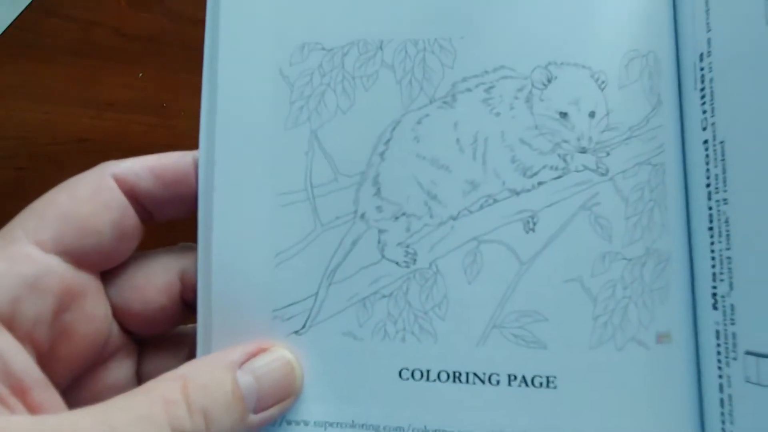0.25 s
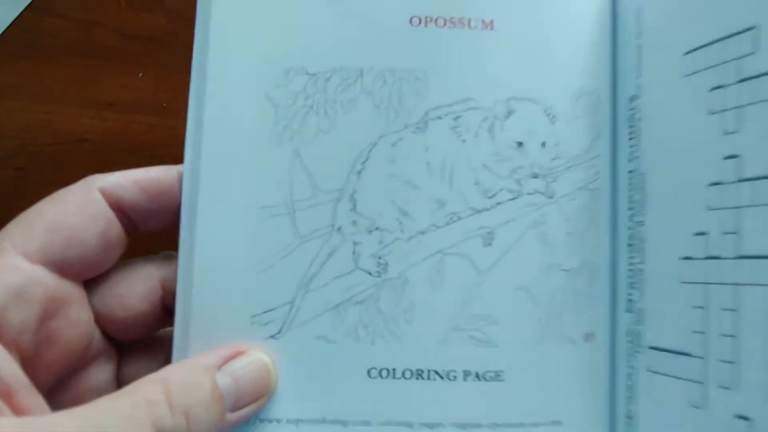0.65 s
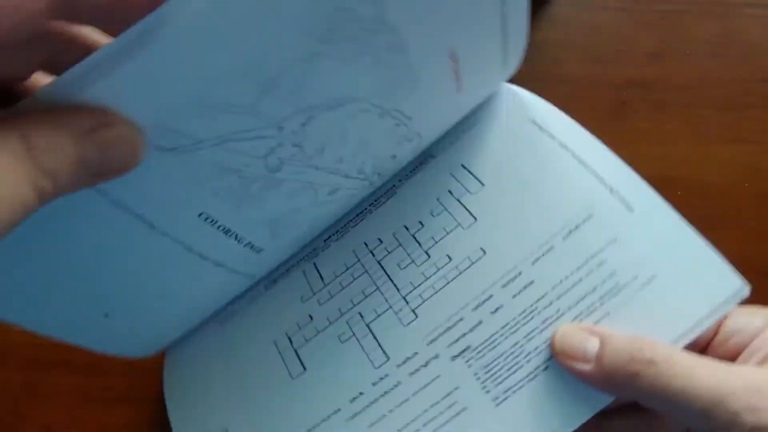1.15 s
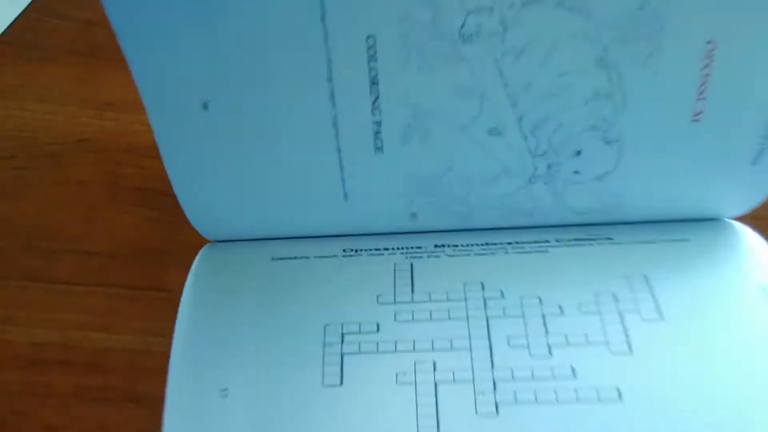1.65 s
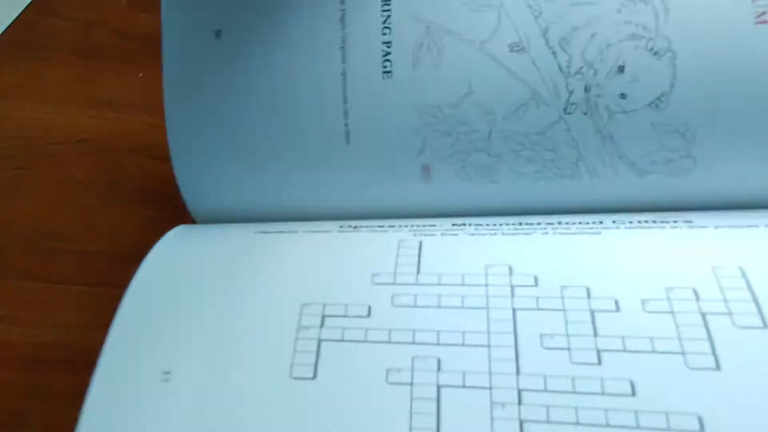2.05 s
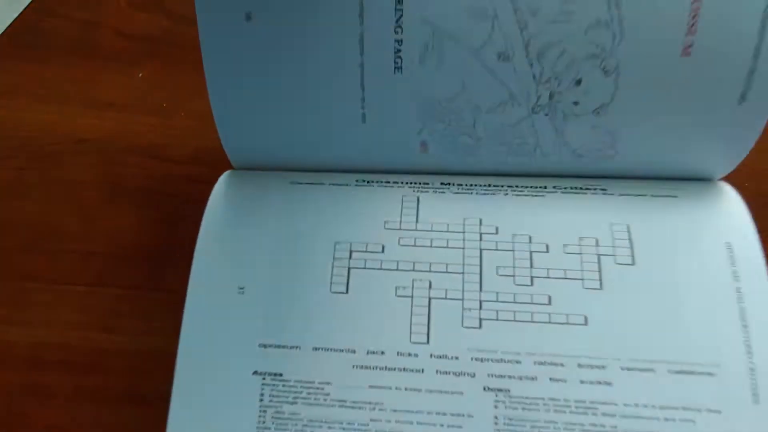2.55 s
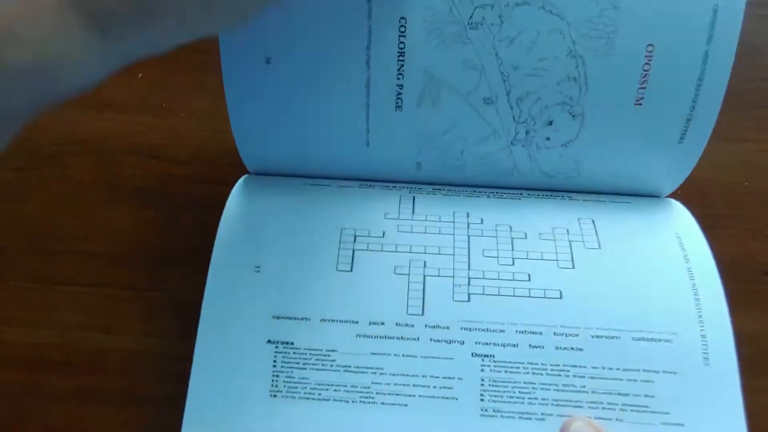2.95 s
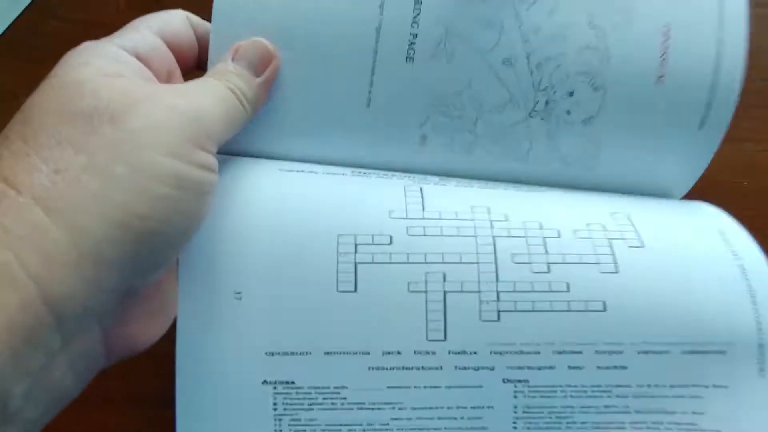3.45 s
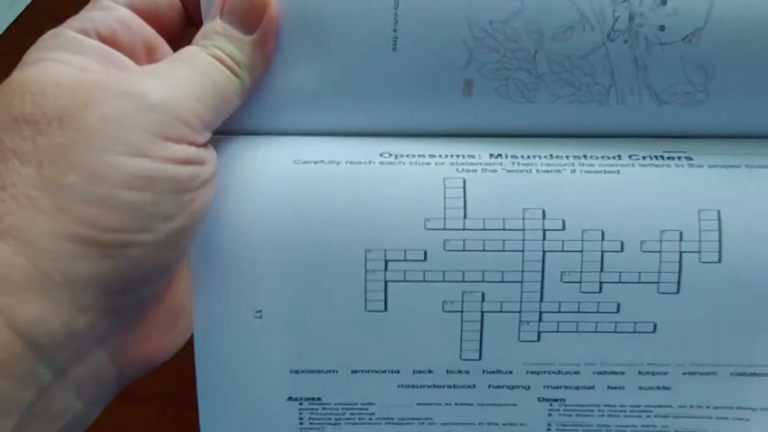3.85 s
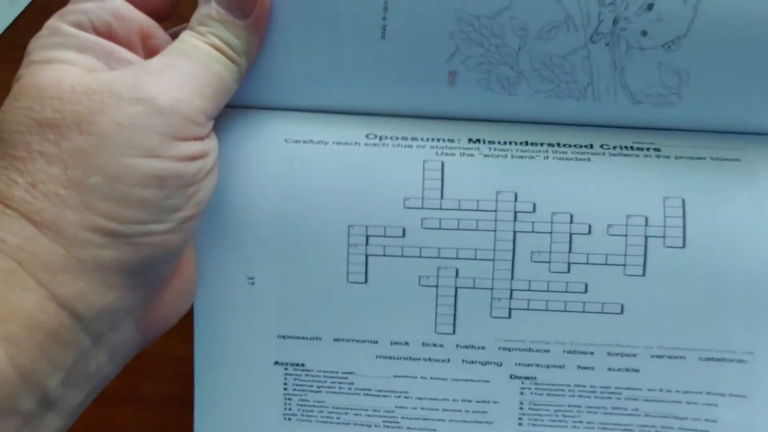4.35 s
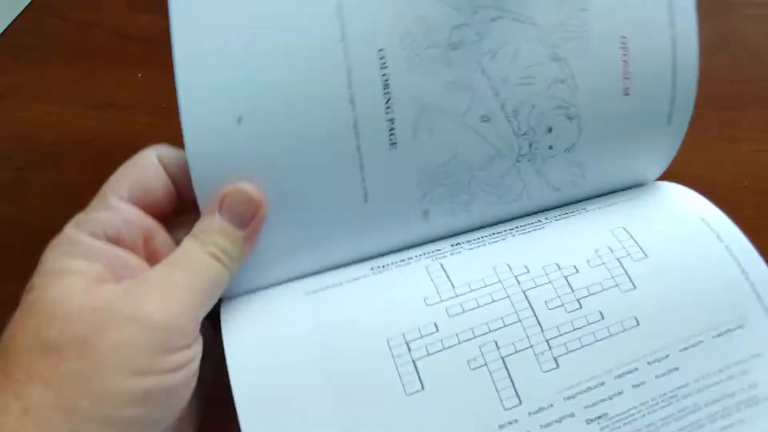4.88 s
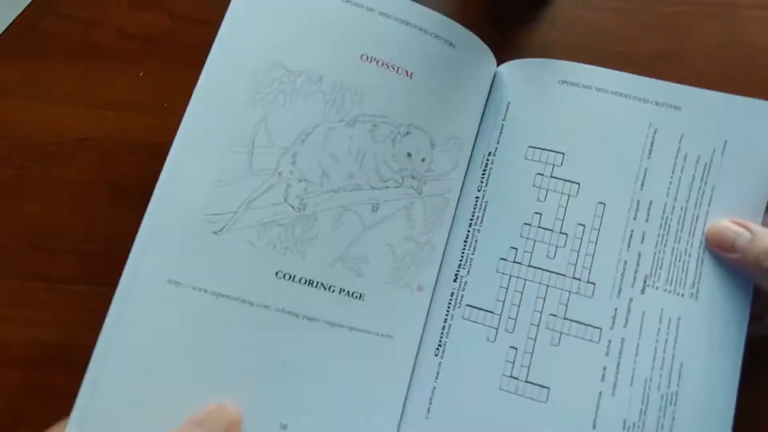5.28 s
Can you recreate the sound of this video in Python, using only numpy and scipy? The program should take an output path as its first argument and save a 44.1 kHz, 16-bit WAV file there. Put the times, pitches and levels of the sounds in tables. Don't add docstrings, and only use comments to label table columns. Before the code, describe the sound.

A low wavering hum and faint hiss underlie close, dry paper sounds in a small room. Fingertips brush the pages of a paperback, sheets buckle hollowly, then only faint scuffs remain. The pages slap flat loudly, scrape in brief separate rustles, go quiet again, and end in the busiest handling, with thuds, crisp ticks and the hardest snap. The microphone is very near.

```python
import sys
import numpy as np
from scipy import signal
from scipy.fft import rfft, irfft, next_fast_len
from scipy.io import wavfile
from scipy.ndimage import uniform_filter1d, minimum_filter1d

SR = 44100
rng = np.random.default_rng(int(sys.argv[2]) if len(sys.argv) > 2 else 0)


def undo_db(level):
    steps = np.asarray(level, float) / 20
    return 10 ** steps


def to_wav(sig):
    pcm = np.clip(np.atleast_2d(sig), -1, 1) * 32767
    pcm = np.round(pcm).astype(np.int16)
    wavfile.write(sys.argv[1], SR, pcm.T)


N = 243431
FRAMES = dict(fs=SR, nperseg=256, noverlap=192)

# (frequency [Hz], likeness [-1 to 1])
PAPER_ALIKE = [(60, 1), (130, 0.97), (290, 0.83), (640, 0.83), (1410, 0.0035), (3100, 0.15), (6820, -0.049),
               (15000, 0.98)]


def evened(x):
    return x / np.sqrt(np.mean(x ** 2) + 1e-20)


def read(points, hz):
    f, value = np.transpose(points)
    return np.interp(np.log(hz + 1), np.log(f + 1), value)


def fine(t, v):
    return np.interp(np.arange(N) / SR, t, v)


def panned(x, lean_db):
    return x * undo_db(np.array([.5 * lean_db, -.5 * lean_db]))


def add(mix, s, sound):
    part = mix[:, round(s * SR):][:, :sound.shape[1]]
    part += sound[:, :part.shape[1]]


def coloured(x, db_of_hz):
    n = x.shape[-1]
    size = next_fast_len(n + 512)
    gain = undo_db(db_of_hz(np.fft.rfftfreq(size, 1 / SR)))
    return irfft(rfft(x, size) * gain, size)[..., :n]


def low_passed(x, hz, order=6):
    return signal.sosfilt(signal.butter(order, hz, fs=SR, output="sos"), x)


def ports(pair, alike):
    n = pair.shape[1]
    same = np.clip(read(alike, np.fft.rfftfreq(n, 1 / SR)), -.99, .99)
    mid, side = rfft(pair) * np.sqrt([1 + same, 1 - same])
    return irfft(np.array([mid + side, mid - side]), n) / 2


def resonate(x, hz, width_hz):
    turn = np.exp(2j * np.pi * np.cumsum(hz * np.ones(x.shape[-1])) / SR)
    r = np.exp(-np.pi * width_hz / SR)
    return 2 * (turn * signal.lfilter([1 - r], [1, -r], x / turn)).real


def resonate_twice(x, hz, width_hz):
    return resonate(resonate(x, hz, width_hz), hz, width_hz)


def patchwork(frames, bins, length, width=1):
    x = uniform_filter1d(rng.standard_normal((frames, bins)), length, 0)
    return evened(uniform_filter1d(x, width, 1)).T


def strokes(t, s, db, rise_ms, hold_ms, fall_ms):
    def column(v):
        return np.maximum(v * np.ones(len(s)), 1)[:, None]

    ms = 1000 * (t - s[:, None])
    before = np.maximum(-ms, 0) / column(rise_ms)
    after = np.maximum(ms - column(hold_ms), 0) / column(fall_ms)
    rounding = 0.056
    under = np.hypot(before + after, rounding) - rounding
    return undo_db(2 * (db[:, None] - 20 * np.minimum(under, 10)))


def bursts(rows, steady_db, rise_ms, fall_ms):
    t = np.arange(0, N / SR, 1 / 1000)
    power = strokes(t, *np.transpose(rows), rise_ms, 0, fall_ms).sum(0)
    return np.sqrt(fine(t, power) + undo_db(2 * steady_db))


def quiet():
    # (frequency [Hz], level [dB per Hz])
    tone_colour = [(12, -46), (20, -19.5), (38, -2), (60, 30), (74, -7), (91, -31.5), (123, -18),
                   (210, -35), (262, -26.5), (422, -43), (574, -35), (1290, -50.5), (6200, -49),
                   (7200, -37), (8300, -46.5), (9200, -52.5), (16000, -59.5)]
    # (frequency [Hz], likeness [-1 to 1])
    tone_alike = [(60, 1), (180, -0.031), (550, 0.32), (1650, -0.44), (4970, -0.83), (15000, 0.64)]
    # (frequency [Hz], left-right [dB])
    tone_lean = [(60, -4.5), (180, -0.5), (550, 7.5), (1650, -0.5), (4970, 3.5), (15000, 4)]
    # (time [s], level [dB])
    jolts = [
        (2.85, -64.5),
        (4.95, -60),
        (5.18, -63),
        (5.36, -68),
    ]

    def tone_db(f):
        balance_db = np.array([[.5], [-.5]]) * read(tone_lean, f)
        return balance_db + read(tone_colour, f) - 40 * (f < 90)

    pair = ports(rng.standard_normal((2, N)), tone_alike)
    tone = undo_db(-72.5) * evened(coloured(pair, tone_db))

    shaken = rng.standard_normal((2, N)) * undo_db([[1.2], [-1.2]])
    drone = resonate_twice(pair, hz=55.0, width_hz=25.0)
    drone = drone + 0.64 * resonate_twice(shaken, hz=74.0, width_hz=27.0)
    drone = drone / np.sqrt(uniform_filter1d(drone.mean(0) ** 2, 6000) + 1e-9)
    sway = evened(resonate_twice(shaken[0, ::-1], hz=32.0, width_hz=20.0))
    drone = drone + undo_db(-4.5) * sway * np.array([[1], [.3]])

    throb_db = 4.0 * np.cos(2 * np.pi * 5.25 * (np.arange(N) / SR - 0.13))
    wander = evened(uniform_filter1d(uniform_filter1d(rng.standard_normal(N), 3000), 3000))
    drone_gain = bursts(jolts, -76 + 5 * wander + throb_db, rise_ms=130, fall_ms=330)
    return tone + drone_gain * drone * undo_db([[.3], [-.3]])


def handling():
    # (time [s], level [dB], rise [ms], hold [ms], fall [ms])
    glides = [(.762, -61, 22, 27, 70), (0.907, -46.5, 27, 92, 52), (1.041, -43, 32, 32, 37),
              (1.115, -27.5, 7.1, 9.3, 70), (1.715, -54, 47, 37, 100), (1.836, -46, 68, 18, 40),
              (1.952, -74.5, 60, 170, 110), (2.228, -61, 26, 3.5, 51), (2.328, -58.5, 21, 3.3, 83),
              (2.46, -58, 43, 3, 120), (2.881, -51, 56, 22, 60), (2.946, -34, 62, 2.5, 37),
              (3.156, -52, 58, 3.2, 30), (3.2, -54.5, 18, 2.1, 50), (3.66, -55, 44, 42, 49),
              (4.149, -53.5, 10, 2.1, 50), (4.322, -58.5, 14, 2.87, 64), (4.596, -50.5, 13, 77, 73),
              (4.778, -44, 110, 7.9, 78), (4.87, -42.5, 65, 180, 60), (5.095, -35.5, 37, 7.5, 120),
              (5.302, -31.5, 140, 2.7, 81), (5.4, -36.5, 110, 76, 38)]
    # (time [s], level [dB], rise [ms], hold [ms], fall [ms])
    rubs = [(1.14, -45, 30, 146, 51), (1.285, -51.5, 63, 44, 15), (1.42, -57.5, 29, 2.4, 62),
            (1.565, -58.5, 110, 3.7, 51), (2.782, -44, 3.4, 24, 22), (2.809, -37.5, 4.6, 4.3, 130),
            (2.943, -35.5, 89, 4, 32), (3.02, -58, 18, 5.3, 50), (3.303, -44, 30, 3.2, 63),
            (3.389, -41.5, 30, 21, 54), (3.472, -26, 41, 12.7, 64), (3.528, -38, 63, 63, 53),
            (3.78, -62, 56, 32, 21), (3.879, -52.5, 13, 31, 65), (3.95, -37.5, 57, 36, 34),
            (4.496, -64, 30, 2.2, 42), (4.719, -33.5, 71, 3.9, 35), (4.97, -46.5, 46, 27, 40),
            (5.033, -28, 25, 120, 140), (5.2, -52.5, 120, 60, 64), (5.352, -32, 77, 14, 490)]
    # (time [s], rumble [dB], rise [ms], fall [ms], pocket resonance [Hz])
    page_bends = [(.78, -65.5, 25, 89, 620), (4.32, -63.5, 15, 38, 1050), (4.495, -64.5, 20, 37, 1100),
                  (.9, -68.5, 97, 350, 784), (1.131, -37.5, 2.2, 100, 879), (1.173, -45, 62, 88, 1006),
                  (1.241, -43, 66, 14, 1115), (1.29, -58, 46, 58, 1041), (1.715, -67.5, 51, 350, 718),
                  (1.85, -90, 56, 150, 599), (2.492, -66.5, 120, 170, 661), (2.79, -33, 3.7, 36, 810),
                  (2.807, -21.5, 4, 50, 782), (2.945, -42.5, 100, 41, 752), (3.153, -48, 58, 117, 633),
                  (3.293, -50.5, 64, 93, 796), (3.388, -41, 16, 90, 1078), (3.476, -39, 82, 180, 887),
                  (3.68, -51.5, 170, 88, 604), (3.975, -43.5, 120, 36, 880), (4.705, -43.5, 62, 51, 942),
                  (4.927, -46, 100, 400, 801), (5.112, -36.5, 190, 37, 861), (5.158, -27.5, 65, 30, 857),
                  (5.25, -29, 170, 45, 876), (5.35, -27, 42, 99, 960), (5.48, -43, 180, 140, 943)]
    # (time [s], rumble [dB], pocket resonance [Hz])
    twitches = [(0.83, -71, 650), (1.429, -64.5, 862), (1.559, -72, 1029), (2.097, -67.5, 645),
                (2.226, -83, 507), (2.329, -61.5, 625.5), (3.8, -53, 650), (3.04, -69.5, 718),
                (4.145, -65, 792), (4.323, -70, 905), (4.5, -63, 766)]
    t = np.arange(0, N / SR, 1 / 1000)
    glide = strokes(t, *np.transpose(glides)).sum(0)
    rub = strokes(t, *np.transpose(rubs)).sum(0)
    hiss = glide + rub

    twitch_rise_ms, twitch_fall_ms = 8.4, 17
    rows = page_bends + [(s, db, twitch_rise_ms, twitch_fall_ms, hz) for s, db, hz in twitches]
    s, db, rise_ms, fall_ms, hz = np.transpose(rows)
    bends = strokes(t, s, db, rise_ms, 0, fall_ms)
    rumble = bends.sum(0)
    pocket_hz = hz @ bends / rumble

    middle = glide * undo_db(2 * -18) + rub * undo_db(2 * -4.5) + rumble * undo_db(2 * -7)
    middle_db = np.minimum(10 * np.log10(middle / hiss), 13)
    return t, 10 * np.log10(hiss), middle_db, 10 * np.log10(rumble), pocket_hz


def grit(grain_ms, grain_db, clump_ms, clump_db):
    grains, clumps = rng.standard_normal((2, N))
    stutter_db = grain_db * evened(uniform_filter1d(grains, round(grain_ms * SR / 1000)))
    stutter_db = stutter_db + clump_db * evened(uniform_filter1d(clumps, round(clump_ms * SR / 1000)))
    return ports(rng.standard_normal((2, N)) * evened(undo_db(stutter_db)), PAPER_ALIKE)


def lined(x, line_db):
    z = signal.stft(x, SR, nperseg=1024, noverlap=768)[2]
    lines = patchwork(z.shape[2], z.shape[1], length=24)
    y = signal.istft(z * undo_db(line_db * lines), SR, nperseg=1024, noverlap=768)[1][:, :N]
    return evened(y) * np.sqrt(np.mean(x ** 2))


def slide():
    # (frequency [Hz], level [dB per Hz])
    hiss_colour = [(710, -26), (1200, -16), (1560, -10.5), (2270, -10), (2920, -10.5), (4450, -10),
                   (4910, -6), (5470, -8), (5780, -5.5), (7200, 1.5), (8050, 4.5), (11300, -28),
                   (12200, -44), (14700, -56.5), (16000, -76.5)]
    # (time [s], left-right [dB])
    hands = [
        (.72, -16),
        (1.9, 4),
        (1.96, -12.5),
        (2.64, -4.5),
        (3.35, -9),
        (3.8, -13.5),
        (5.02, -10),
        (5.52, -9),
    ]
    # (time [s], peak [dB], left-right [dB], length [ms])
    scuffs = [(1.782, -49, 17, 6.4), (1.919, -63.5, -7, 10.3), (2.096, -76, -15, 4.1),
              (2.221, -58, -8, 4.6), (2.324, -69, -27, 2.8), (2.915, -37.5, -15, 1), (3.303, -55, -24, 6),
              (3.388, -33, 0, 4), (3.878, -58, 5, 3.9), (4.3151, -60.5, -17, 6.1), (4.396, -53, -3.5, 1.1),
              (4.491, -63.5, -21, 0.92), (4.589, -54, -18.5, 1.3), (4.715, -32.5, 1.5, 7.3),
              (5.019, -35.5, 39, 0.79), (5.1549, -11.5, 8, 1.16)]
    friction = grit(grain_ms=1.0, grain_db=1.0, clump_ms=32.0, clump_db=1.0)
    hz, t, z = signal.stft(friction, **FRAMES)
    patches = patchwork(len(t), len(hz), length=24, width=4)
    streaks = patchwork(len(t), len(hz), length=45)
    times, hiss_db, middle_db = handling()[:3]
    middle_db = np.interp(t, times, middle_db) + 10.5
    reach = np.clip(np.log(6500 / (hz + 1)) / np.log(1.9), 0, 1)[:, None]
    colour_db = read(hiss_colour, hz)[:, None] + reach * middle_db
    z = z * undo_db(colour_db + 1.6 * patches + 2.2 * streaks)
    hiss = signal.istft(z, **FRAMES)[1][:, :N]

    treble = hz > 4500
    treble_share = np.mean(abs(z[:, treble]) ** 2) / np.mean(abs(z) ** 2) * np.mean(treble)
    hiss = hiss / np.sqrt(treble_share * np.mean(hiss ** 2))
    hiss = lined(hiss, line_db=4.5)

    hand_s, hand_lean_db = np.transpose(hands)
    strength = undo_db(fine(times, hiss_db)) * panned(0.85, fine(hand_s, hand_lean_db) + 11.1)
    for s, db, lean_db, ms in scuffs:
        u = np.arange(3000) / SR / (max(ms, 1) / 1000)
        jump = undo_db(db - 2.5) * (u * np.exp(1 - u))[None]
        add(strength, s - .001, panned(jump, np.array([lean_db])))
    return hiss * strength


def fizz():
    # (time [s], level [dB])
    flicks = [
        (2.95, -79.5),
        (5.285, -68.5),
        (5.34, -56),
        (5.43, -55),
        (5.5, -66),
    ]
    hz, t, z = signal.stft(rng.standard_normal((2, N)), **FRAMES)
    streaks = patchwork(len(t), len(hz), length=30, width=3)
    z = z * undo_db(5.0 * streaks) * ((hz > 12000) & (hz < 15800))[:, None]
    top = evened(signal.istft(z, **FRAMES)[1][:, :N])
    haze_db = -76 + 0.33 * fine(*handling()[:2])
    return top * bursts(flicks, haze_db, rise_ms=50, fall_ms=23)


def bend():
    # (factor on the resonance, width [Hz], level [dB])
    pocket_modes = [(.72, 107, 0.5), (1.0, 134, -3), (1.2, 120., -2), (1.55, 205, -8.5),
                    (2.15, 230., -11.5)]
    t, _, _, level_db, pocket_hz = handling()
    level_db, pocket_hz = fine(t, level_db), fine(t, pocket_hz)
    creak = grit(grain_ms=3.1, grain_db=1.5, clump_ms=25.0, clump_db=3.5)

    pocket = np.zeros((2, N))
    for k, (factor, width_hz, db) in enumerate(pocket_modes):
        pocket += (-1) ** k * undo_db(db) * resonate(creak, factor * pocket_hz, width_hz)
    pocket = evened(signal.lfilter(*signal.butter(2, [300, 2400], "band", fs=SR), pocket))

    flap_db = -2 - 23.5 * np.log2(np.maximum(pocket_hz / 650.0, 1))
    flap = evened(resonate(resonate(creak[:, ::-1], 230.0, 280.0), 260.0, 240.0))
    return undo_db(level_db) * (pocket + undo_db(flap_db) * flap)


def rings():
    # (time [s], peak [dB], pitch [Hz], width [Hz],
    # length [ms])
    flexes = [(.811, -51.5, 5280, 1100, 19), (1.124, -35, 206, 101, 24), (1.141, -40, 830, 118, 13),
              (1.153, -33, 925, 121, 14), (1.161, -28.5, 930, 60.6, 20), (1.176, -33.5, 1455, 200, 43),
              (1.21, -32.5, 1460, 306, 47), (1.212, -34.5, 1996, 158.5, 59), (1.212, -36, 887, 101, 53),
              (1.238, -30.5, 970, 148, 8.6), (1.25, -44, 836, 79.3, 17), (1.28, -49, 1006, 120, 69),
              (2.776, -34, 4780, 913, 99), (2.806, -14, 2100, 1200, 2.5), (2.81, -29.5, 2190, 1220, 67),
              (2.845, -28.5, 286, 151, 15.4), (3.46, -31, 2190, 201.7, 66), (3.46, -31.5, 3860, 297, 45),
              (3.575, -40, 257, 100, 64), (3.465, -29, 5880, 400, 62), (3.785, -51.5, 1900, 300, 48),
              (3.93, -44, 1760, 400, 92), (3.95, -46, 616, 199.7, 88), (4.7, -34, 2097, 401, 16),
              (5.044, -28, 2140, 398, 15), (5.042, -23, 4930, 800, 140), (5.072, -23.5, 2310, 402, 43),
              (1.115, -34, 5500, 1210, 87), (4.925, -51.5, 1060, 298, 53), (5.118, -28, 1000, 302, 47),
              (5.21, -25.5, 2230, 610, 72), (5.346, -11.5, 897, 151, 13), (5.35, -28, 2440, 304, 43),
              (5.385, -34.5, 280, 99, 54), (5.385, -34, 8050, 500, 140), (5.16, -34.5, 256, 149, 30),
              (5.468, -31.5, 870, 250, 6.2), (5.477, -28, 875, 300, 4.3),
              (1.41, -66.5, 1160, 149, 100), (1.535, -63.5, 1084, 119, 64), (1.69, -69, 416, 79.5, 52),
               (1.93, -66.5, 195, 40, 190), (2.21, -59.5, 514, 101, 48), (2.46, -59.5, 1650, 120, 25),
               (3.005, -61.5, 111.7, 40, 54), (3.29, -47, 2070, 300, 11), (3.378, -36, 1130, 200, 22),
               (3.385, -38, 2270, 200, 40), (4.135, -60, 320, 100.4, 57), (4.31, -59.5, 600, 150, 40),
               (4.485, -65, 603, 151, 53), (4.712, -27.5, 5440, 500, 17), (5.125, -31, 1670, 500, 50),
               (5.22, -42, 1460, 400, 47), (2.812, -24.5, 4300, 1500, 58), (1.29, -51.5, 2500, 1480, 61),
               (5.16, -32.5, 1570, 494, 100), (5.342, -22.5, 1450, 400, 33)]
    # (time [s], peak [dB], pitch [Hz])
    ticks = [(1.783, -59, 7500), (2.9152, -31, 8200), (4.6846, -24, 7940), (5.09, -16, 6800),
             (5.1051, -13, 7550), (5.109, -14, 7700), (5.1522, -14, 7800), (5.453, -27, 8100),
             (5.459, -24, 7700), (2.806, -18.5, 8000), (5.0185, -24, 5900), (3.474, -25, 7760),
             (3.485, -21, 7400), (3.521, -27.5, 7700), (5.276, -20.5, 8000), (2.944, -26, 8300)]
    tick_width_hz, tick_ms = 2600, 1.7
    rows = flexes + [(s, db, hz, tick_width_hz, tick_ms) for s, db, hz in ticks]
    out, t = np.zeros((2, N)), np.arange(8192) / SR
    peak_at = 0.23
    for s, db, hz, width_hz, ms in rows:
        u = np.clip(t / (max(ms, 2) / 1000), 0, 1)
        swell = np.sin(np.pi * u ** (np.log(.5) / np.log(peak_at)))
        scrape = ports(rng.standard_normal((2, len(t))), PAPER_ALIKE)
        ring = resonate_twice(scrape, hz, width_hz) * swell
        add(out, s, undo_db(db) * ring / abs(ring).max())
    return low_passed(out, 9000, order=8)


def pocket_ring(t, hz, cycles):
    u = t * hz / cycles
    return np.sin(2 * np.pi * hz * t) * (1 - np.exp(-(u / 0.14) ** 2)) * np.exp(-3.5 * u ** 2)


def pops():
    # (time [s], peak [dB], pitch [Hz], crack against pop [dB], length [cycles])
    buckles = [(1.12, -24, 890, -34, 5.3), (1.189, -25.5, 914, -37, 6.3), (1.221, -32, 870, -18, 4.5),
               (2.218, -60.5, 510, -7, 4.4), (2.7856, -10, 780, -28, 3.3), (2.8051, -3, 800, -7.5, 2.6),
               (2.927, -30, 400, -9, 3.1), (3.147, -23, 650, -45, 2), (3.271, -31.5, 396, -26, 0.68),
               (3.296, -37, 970, -11, 4.3), (3.388, -24, 1117, -33, 8.5), (3.522, -31, 840, -32, 2.7),
               (3.548, -33.5, 433, -27, 4.5), (3.675, -39.5, 440, -11, 6.3), (4.9164, -9, 657, -41, 3.2),
               (5.018, -18.5, 330, -17.5, 1.64), (5.156, -9.5, 676, -35, 1.3), (5.204, -23, 880, -25, 1.5),
               (5.328, -37, 820, 8, 10), (5.3395, 3.5, 850, -15, 2.76), (5.46, -26.5, 740, -23, 2.5),
               (5.489, -27, 910, -31, 3.6)]
    # (time [s], peak [dB], pitch [Hz], length [cycles])
    soft_rings = [(2.793, -33, 820, 5.3), (2.812, -20.5, 805, 2.5), (3.462, -32, 920, 6.2),
                  (3.482, -36.5, 830, 9.5), (3.502, -36.5, 875, 3.9), (4.9172, -23, 1067, 7.9),
                  (4.923, -29, 1130, 10), (4.933, -36, 600, 4), (5.135, -28, 900, 9), (5.259, -30, 980, 16),
                  (5.271, -34, 1030, 16), (5.33, -24, 880, 12), (5.34, -6, 1398, 6.9), (2.8066, -17, 2200, 6),
                  (5.346, -26, 1030, 15), (5.357, -21, 930, 8), (5.368, -25, 760, 11)]
    # (frequency [Hz], level [dB per Hz])
    crack_colour = [(710, -29), (1200, 1.5), (2620, 10), (3150, -5.5), (6370, -1), (6870, -11.5),
                    (7910, -5), (8630, -14), (13200, -22), (14200, -64.5)]
    out = np.zeros((2, N))
    t = np.maximum(np.arange(1500) / SR - 0.001, 0)
    left_db = 2.5
    for s, db, hz, crack_db, cycles in buckles:
        noise = rng.standard_normal((2, len(t)))
        rattle = low_passed(noise, 9000.0) * np.exp(-t / 0.0053) * (t > 0)
        front = noise * t / 0.00033 * np.exp(-t / 0.00036)
        crack = ports(front + 0.055 * rattle, PAPER_ALIKE)
        crack = coloured(crack, lambda f: read(crack_colour, f))
        sound = pocket_ring(t, hz, cycles) + undo_db(min(crack_db + 8.5, 1.5)) * crack / abs(crack).max()
        lean_db = left_db - 0.84 * max(crack_db + 11.5, 0)
        add(out, s + 0.00039, panned(undo_db(db) * sound, np.array([lean_db])))
    for s, db, hz, cycles in soft_rings:
        add(out, s, panned(undo_db(db) * pocket_ring(t, hz, cycles), np.array([left_db])))
    return out


def pushes():
    # (time [s], peak [dB], pitch [Hz], t60 [s], left-right [dB])
    thuds = [
        (1.12, -32.5, 218, 0.031, 10),
        (2.473, -46.5, 125, 0.023, 11),
        (3.143, -35, 188, 0.018, 2.5),
        (4.916, -41, 188, 0.094, -10),
        (5.018, -45, 144, 0.22, -18),
        (5.156, -22.5, 175, 0.038, 5),
        (5.337, -39.5, 138, 0.45, 0),
        (5.15, -43.5, 39, 0.68, 20),
        (2.8, -44, 120, 0.11, 3),
        (6.1, -44.5, 40, 0.19, 16.5),
    ]
    out, t = np.zeros((2, N)), np.arange(12000) / SR
    for s, db, hz, t60, lean_db in thuds:
        envelope = np.minimum(t / 0.00057, 1) * undo_db(db - 60 * t / max(t60, .02))
        thud = np.sin(2 * np.pi * hz * t) * envelope
        add(out, s, panned(thud, np.array([lean_db])))
    return out


def room(x, tail_db):
    # (delay [ms], level [dB])
    echoes = [
        (2.2, -18),
        (6.8, -15.5),
        (10.2, -22),
        (13.5, -25.5),
        (19, -38),
        (29, -21.5),
    ]
    # (frequency [Hz], t60 [s])
    decay = [(150, 0.4), (700, 0.035), (2500, 0.28), (8000, 0.047)]
    size = SR // 2
    taps = np.zeros((2, size))
    at = np.arange(200, size - 20, 20) + rng.integers(0, 20, (2, (size - 201) // 20))
    np.put_along_axis(taps, at, rng.choice([-1., 1.], at.shape), 1)
    hz, t, z = signal.stft(ports(taps, PAPER_ALIKE), SR, nperseg=256)
    tail = signal.istft(z * undo_db(-60 * t / read(decay, hz)[:, None]), SR, nperseg=256)[1]
    tail = undo_db(tail_db) * tail / np.linalg.norm(tail[0])
    for ms, db in echoes:
        tail[[0, 1], round(ms * SR / 1000) + rng.integers(0, 8, 2)] += undo_db(db)
    tail = signal.lfilter(*signal.butter(1, 1570.0, fs=SR), tail)
    tail = low_passed(tail, 9000.0)
    return x + signal.fftconvolve(x, tail, axes=1)[:, :N]


def masked(x):
    # (from [s], to [s])
    slapped = [
        (2.77, 2.8),
        (2.812, 2.875),
    ]
    hz, t, z = signal.stft(x, **FRAMES)
    power = uniform_filter1d(uniform_filter1d(abs(z) ** 2, 5, 1), 5, 2)
    band_db = 10 * np.log10(power + 1e-20)
    loudest_db = -minimum_filter1d(-band_db[:, hz > 1500].max(1, keepdims=True), size=17, axis=2)
    keep = undo_db(-np.clip(0.67 * (loudest_db - band_db - 21.5), 0, 50))
    keep = np.where(hz[:, None] > 10000.0, keep, 1)
    for start, end in slapped:
        keep[:, hz > 9200] *= np.where((t > start) & (t < end), undo_db(-50), 1)
    return signal.istft(z * keep, **FRAMES)[1][:, :N]


def scene():
    # (frequency [Hz], left-right [dB])
    port_lean = [(60, -2.5), (150, 0), (380, 1), (950, 1.5), (2380, 0), (5980, 1.5), (15000, -33)]
    friction = undo_db(-3.5) * (slide() + bend()) + rings()
    paper = room(pops(), tail_db=-9.0) + room(friction, tail_db=-13)
    paper = coloured(paper, lambda f: np.array([[.5], [-.5]]) * read(port_lean, f))
    return masked(paper) + fizz() + pushes() + quiet()


def low_pass(x):
    return signal.sosfilt(signal.butter(12, 16730, fs=SR, output="sos"), x)


def record(dry):
    return low_pass(np.clip(dry, -1, 1))


dry = scene()
out = record(dry)
to_wav(out)
```